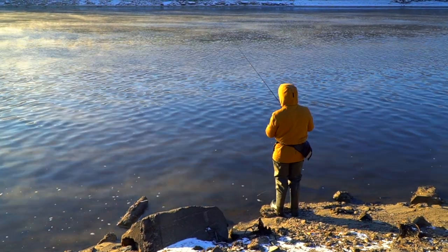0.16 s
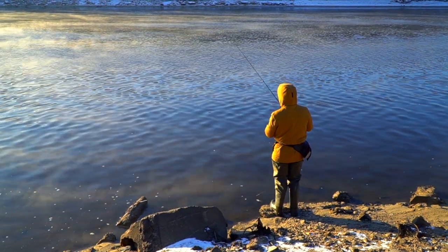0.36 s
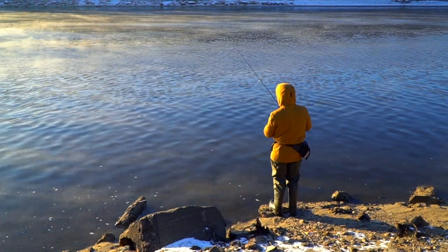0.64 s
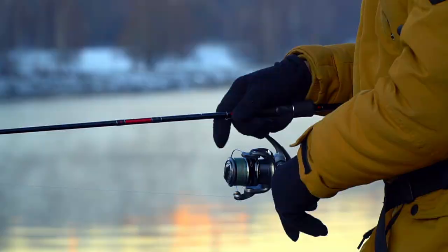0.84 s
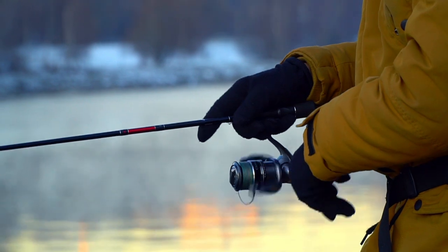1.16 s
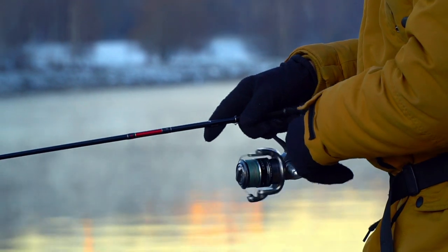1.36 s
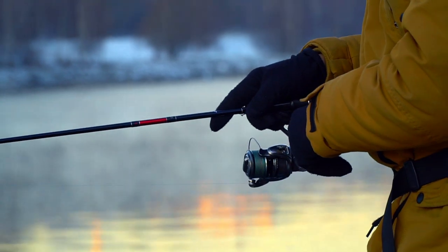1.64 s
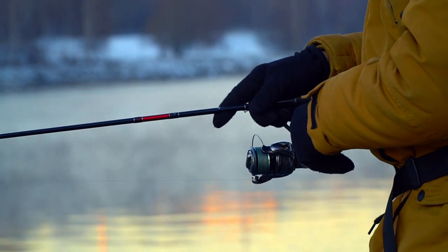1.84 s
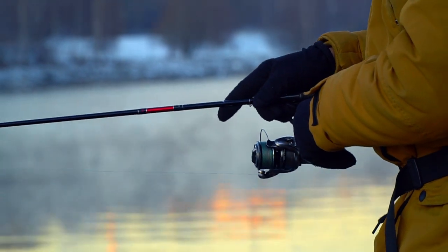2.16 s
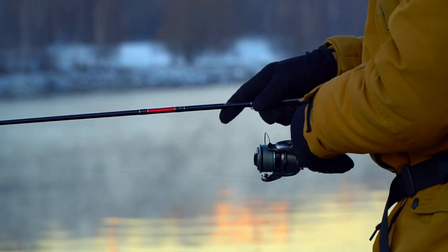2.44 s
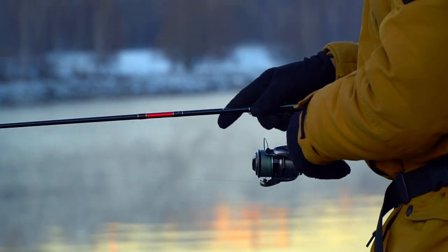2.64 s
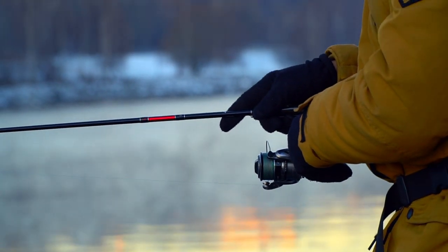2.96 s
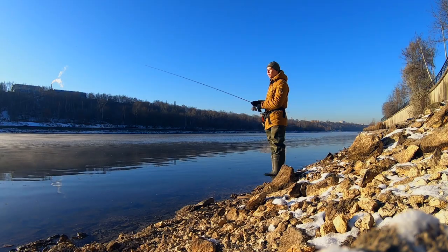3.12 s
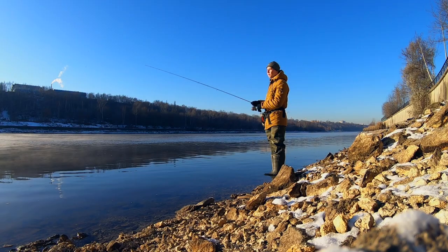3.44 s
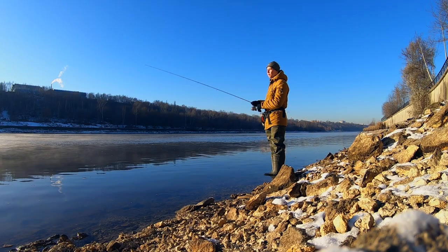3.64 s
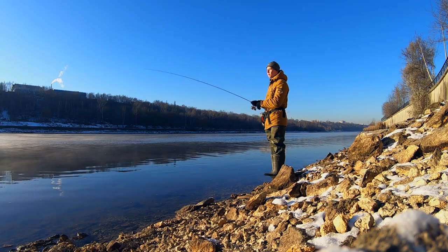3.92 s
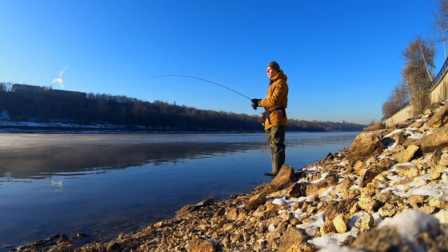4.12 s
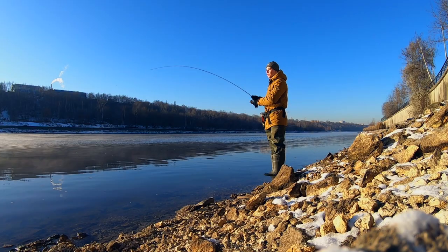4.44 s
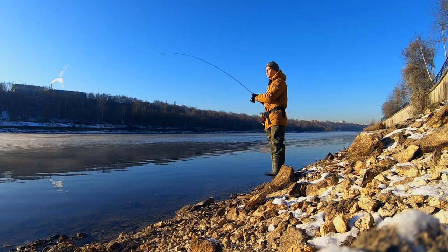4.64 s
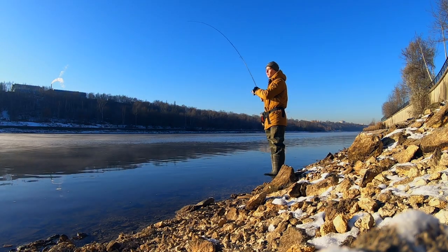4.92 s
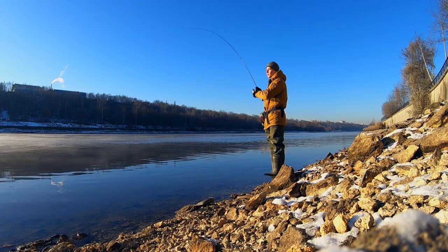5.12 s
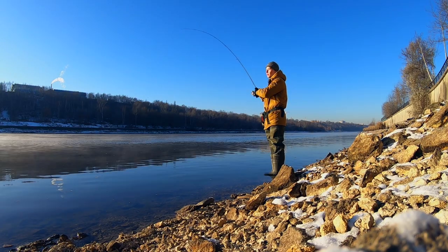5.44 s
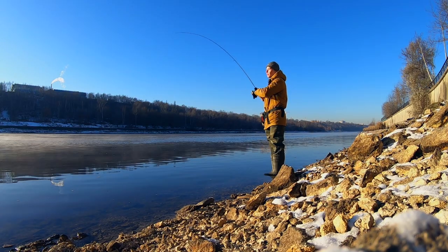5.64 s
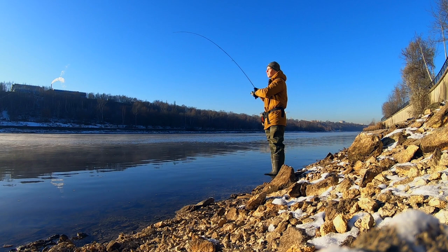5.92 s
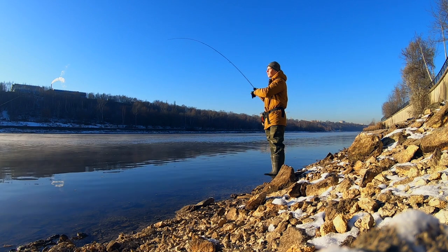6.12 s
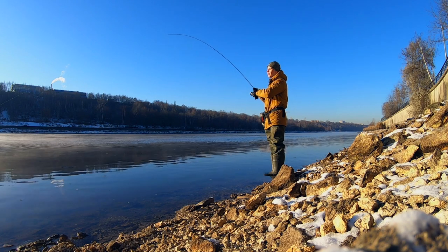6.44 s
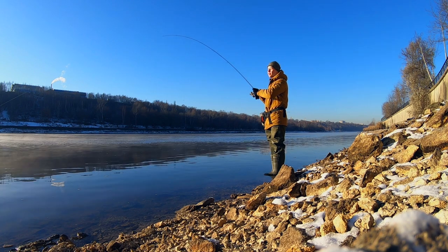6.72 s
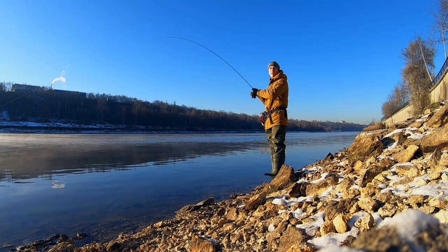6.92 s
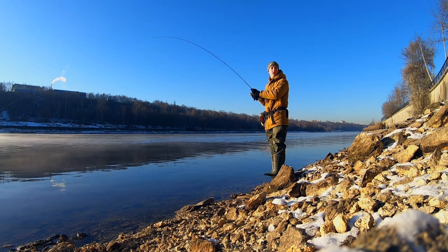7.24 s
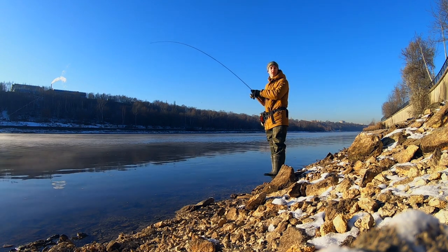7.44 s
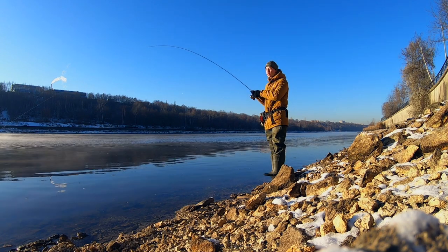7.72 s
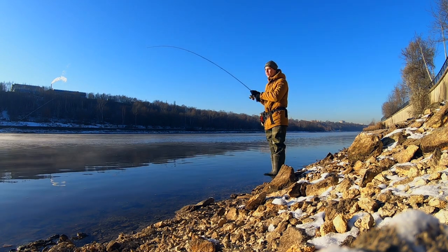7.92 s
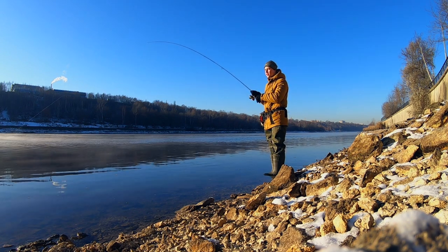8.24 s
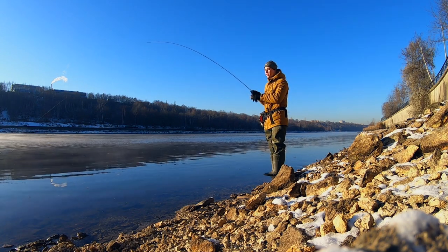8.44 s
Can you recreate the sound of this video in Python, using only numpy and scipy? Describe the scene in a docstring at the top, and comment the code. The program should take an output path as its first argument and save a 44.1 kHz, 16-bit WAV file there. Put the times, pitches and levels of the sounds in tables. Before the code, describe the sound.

Distant traffic rumbles continuously across an open riverbank for about eight and a half seconds, with no close sounds. The sound is mostly deep bass and muffled tyre drone, swelling only gently, with a softer wide roar and very faint hiss. From the start a low wavering hum around 320 Hz flutters and drops out, clearest until about 3.8 s, then mostly buried. Faint airy tyre whistling lies at the opening, and a tiny high squeak passes at 2.1 s. A heavy engine near 66 Hz beats slowly throughout, becoming strongest from roughly 3.8 to 5.8 s. Another low engine note climbs slightly, peaking about 6.5 s. At 6.7 s a faint mid-pitched tyre whistle appears and fades. Soft dull thuds follow near 7.4, 7.6, 7.9, 8.1 and 8.5 s. Stereo microphones are far away; the road's arrival is slightly left, with diffuse surroundings.

```python
"""A low traffic rumble with tyre roar and hiss, far off across a river bank, at two microphones.
Rumble and tyre drone are shaped noise arriving from the left as one front; roar and hiss are
independent noise at each microphone. A throbbing engine, a wavering hum, a whine and gliding
engine notes are wandering sines; far squeals mix narrow noise with a line; thuds are noise bursts."""
import sys
import numpy as np
from scipy import signal
from scipy.fft import rfft, irfft, next_fast_len
from scipy.io import wavfile
from scipy.ndimage import uniform_filter1d, map_coordinates

SR = 44100
rng = np.random.default_rng(int(sys.argv[2]) if len(sys.argv) > 2 else 0)


def digitize_waveform(pressure):
    """Quantize a signal to 16-bit integers and store it at the path in sys.argv[1].

    Rows of a 2-D input are taken as channels; values are limited to [-1, 1].
    """
    field = np.atleast_2d(pressure).T
    bounded = np.clip(field, -1, 1)
    quanta = np.round(bounded * 32767).astype(np.int16)
    wavfile.write(sys.argv[1], SR, quanta)


N = 378378
TIME_S = np.arange(N) / SR
LEFT_RIGHT = np.array([[1], [-1]])


def amp(level_db):
    """Gain of a level in dB."""
    return 10 ** (np.asarray(level_db) / 20)


def unit(x):
    """x at rms 1."""
    return x / np.sqrt(np.mean(x ** 2) + 1e-20)


def along(points, hz):
    """Interpolate (freq_hz, value) points on a log frequency axis."""
    point_hz, value = np.transpose(points)
    return np.interp(np.log(hz + 1), np.log(point_hz + 1), value)


def curves(rows):
    """One value per sample for each column after the time."""
    time_s, *columns = np.transpose(rows)
    return [np.interp(TIME_S, time_s, column) for column in columns]


def gate(rows, fade_s):
    """Linear fades centred on the first and last row times."""
    inside_s = np.minimum(TIME_S - rows[0][0], rows[-1][0] - TIME_S)
    return np.clip(inside_s / fade_s + .5, 0, 1)


def wobble(knots_per_s):
    """Smooth curve through random knots."""
    knots = rng.standard_normal(int(N * knots_per_s / SR) + 4)
    return map_coordinates(knots, [np.arange(N) * knots_per_s / SR])


def filtered(x, response):
    """x times a complex response of frequency."""
    size = next_fast_len(N + SR // 2)
    spectrum = rfft(x, size) * response(np.fft.rfftfreq(size, 1 / SR))
    return irfft(spectrum, size)[..., :N]


def noise(spectrum, patchy_db, channels):
    """Coloured noise of rms 1 with time-frequency patches of random gain, shared by the channels."""
    cells = signal.stft(rng.standard_normal((channels, N)), nperseg=2048)[2]
    patches = rng.standard_normal(cells.shape[1:])
    patches = uniform_filter1d(patches, size=8, axis=0)   # over frequency
    patches = uniform_filter1d(patches, size=10, axis=1)  # over time
    white = signal.istft(cells * amp(patchy_db * unit(patches)), nperseg=2048)[1][:, :N]
    return unit(filtered(white, lambda hz: amp(along(spectrum, hz))))


def tone(pitch_hz, waver_hz, knots_per_s):
    """A sine of rms 1 whose pitch wanders."""
    cycles = np.cumsum(pitch_hz + waver_hz * wobble(knots_per_s)) / SR
    return np.sqrt(2) * np.sin(2 * np.pi * (rng.random() + cycles))


# phase by which the left microphone leads: freq_hz, lead_rad
FRONT_LEAD = [(60, .02), (115, .03), (170, .1), (240, .18), (320, .33), (470, .78), (620, 1.6), (800, 2.8),
              (1300, 5)]


def front(x):
    """A sound from the left reaches the left microphone first: half the lead each way."""
    return filtered(x, lambda hz: np.exp(.5j * along(FRONT_LEAD, hz) * LEFT_RIGHT))


# slow swell of the road: time_s, deep_db, rumble_db, drone_db, roar_db, hiss_db
ROAD_LEVELS = [(0, -32, -31.5, -34.5, -43.5, -56), (.7, -29, -32.5, -34.5, -43.5, -55.5),
               (1.3, -27, -32.5, -35, -44, -57), (1.8, -29.5, -31, -34.5, -43, -57.5),
               (2.3, -31.5, -32.5, -33, -43.5, -58), (2.8, -29.5, -31.5, -33.5, -42.5, -56.5),
               (3.1, -28, -32, -33.5, -42.5, -56.5), (3.5, -30.5, -32.5, -31.5, -43, -57),
               (3.85, -31.5, -29, -31, -42.5, -57.5), (4.3, -31, -34, -34, -42.5, -57.5),
               (4.8, -29, -30.5, -33, -41.5, -57.5), (5.15, -28.5, -32.5, -33, -43, -57),
               (5.8, -28.5, -32.5, -34, -42.5, -57.5), (6.5, -26.5, -32.5, -36, -41.5, -58),
               (7, -28, -33.5, -36, -42, -59.5), (7.4, -29, -31.5, -33.5, -42.5, -60.5),
               (8, -28, -31.5, -35, -43, -59.5), (8.58, -31.5, -30.5, -33, -40.5, -58.5)]
# noise spectra: freq_hz, density_db (per Hz, relative)
DEEP_SPECTRUM = [(12, -29), (24, -12.5), (32, -11), (42, 0.5), (55, -0.5), (65, 2), (74, -1), (85, 3.5),
                 (100, -1.5), (115, -1), (150, -8.5), (200, -27.5), (400, -120)]
RUMBLE_SPECTRUM = [(40, -89), (80, -24), (120, -6.5), (165, 2.5), (230, -0.5), (280, -1), (330, -14),
                   (450, -44.5), (900, -120)]
DRONE_SPECTRUM = [(100, -100), (220, -31), (300, -5), (340, -1), (420, -8.5), (550, -12.5), (660, -16),
                  (800, -26), (1000, -36.5), (1400, -70.5), (2500, -120)]
ROAR_SPECTRUM = [(40, -38), (110, -10), (160, -9), (300, -4.5), (450, -11.5), (640, -0.5), (800, -0.5),
                 (1050, -3.5), (1700, -9.5), (2400, -17), (3500, -32), (6000, -62.5), (12000, -100)]
HISS_SPECTRUM = [(500, -58.5), (1500, -0.5), (3000, 1), (4500, -5), (7000, -12), (9500, -17), (12000, -24),
                 (14000, -32), (15300, -36)]
# short surges and dips of the front's layers: time_s, change_db
BASS_SURGES = [(3.82, 2), (4.36, 3), (7.04, 3), (7.96, 3), (8.1, -4), (8.28, 2.5)]
SURGE_HALF_S = 0.03  # centre to 1/e of the dB change
WANDER_DB, WANDER_KNOTS_PER_S = 0.31, 6  # small random level wander of each layer


def road():
    """Engines and tyre drone arrive as one front; roar and hiss differ between microphones."""
    deep_db, rumble_db, drone_db, roar_db, hiss_db = curves(ROAD_LEVELS)
    surges_db = sum(change_db * np.exp(-((TIME_S - time_s) / SURGE_HALF_S) ** 2)
                    for time_s, change_db in BASS_SURGES)

    def change_db():
        """Common surges plus a fresh random wander for each layer."""
        return surges_db + WANDER_DB * wobble(WANDER_KNOTS_PER_S)

    deep = amp(deep_db + change_db()) * noise(DEEP_SPECTRUM, patchy_db=0.23, channels=1)
    rumble = amp(rumble_db + change_db()) * noise(RUMBLE_SPECTRUM, patchy_db=1.0, channels=1)
    drone = amp(drone_db + change_db()) * noise(DRONE_SPECTRUM, patchy_db=0.36, channels=1)
    roar = amp(roar_db + 0.62 * wobble(3.09)) * noise(ROAR_SPECTRUM, patchy_db=1.1, channels=2)
    hiss = amp(hiss_db + .3 * wobble(6)) * noise(HISS_SPECTRUM, patchy_db=.3, channels=2)
    return front(deep + rumble + drone) + roar + hiss


# noise spectrum: freq_hz, density_db (per Hz, relative)
DIFFUSE_BASS_SPECTRUM = [(10, -42.5), (25, -9.5), (45, -9), (70, -4.5), (105, -1.5), (135, -7), (200, -12),
                         (400, -100)]


def diffuse_bass():
    """Diffuse deep rumble: noise independent at each microphone."""
    return amp(-40.5 + 1.1 * wobble(1.0)) * noise(DIFFUSE_BASS_SPECTRUM, patchy_db=2.5, channels=2)


# heavy engine: time_s, pitch_hz, level_db (before the nulls and wander; includes shallow dips)
ENGINE_THROB = [(0, 65.8, -28.5), (.7, 64.7, -33.5), (1.1, 64.94, -32), (1.7, 64.85, -35.5),
                (2.15, 64.6, -29), (2.6, 66.48, -39), (3.45, 63.1, -30.5), (3.7, 65.6, -29.5),
                (3.82, 68.3, -23.5), (4.19, 65.26, -21.5), (4.3, 65.7, -30), (4.38, 66.5, -18.5),
                (4.58, 68.1, -20.5), (4.78, 67, -24), (5.0, 65.55, -19.5), (5.13, 66.56, -32.5),
                (5.2, 68.2, -22.5), (5.39, 66.8, -20), (5.57, 69.03, -16.5), (5.66, 67.36, -25.5),
                (5.75, 65.5, -23.5), (6.1, 66.2, -42.5), (6.6, 63.3, -27), (7.3, 63.5, -29.5),
                (8.58, 64.7, -33.5)]
# moments when the beating note cancels: time_s
ENGINE_NULLS = [-.4, .13, .83, 1.57, 1.88, 2.55, 3.06, 3.66, 4.07, 4.46, 4.88, 5.45, 5.98, 6.33, 6.78, 7.65,
                8.05, 8.7]
THROB_SHAPE = 0.78  # exponent; below 1 the throbs are flat-topped


def heavy_engine():
    """A low note beats against itself: it cancels at each null and flips sign."""
    pitch_hz, level_db = curves(ENGINE_THROB)
    half_cycles = np.interp(TIME_S, ENGINE_NULLS, np.arange(len(ENGINE_NULLS)))
    beat = np.sin(np.pi * half_cycles)
    throb = np.sign(beat) * np.abs(beat) ** THROB_SHAPE
    return front(throb * amp(level_db + 1.8 * wobble(13)) * tone(pitch_hz, 0.69, 7))


# wavering hum: time_s, pitch_hz, level_db (line alone, before flutter)
HUM_LINE = [(0, 316, -35), (.3, 319, -32), (.62, 315, -31), (.83, 318, -42), (.95, 319, -35),
            (1.2, 318, -33), (1.46, 319, -30.5), (1.68, 320, -36), (1.81, 318, -55), (2.03, 321, -31),
            (2.18, 320, -41.5), (2.31, 315, -34), (2.5, 316, -51), (2.7, 317, -46), (2.79, 318, -25.5),
            (2.88, 320, -37.5), (3.0, 322, -34.5), (3.17, 322, -46), (3.28, 319, -30.5), (3.42, 317, -45),
            (3.6, 317, -39.5), (3.77, 322, -32.5), (3.95, 320, -48.5), (4.2, 320, -46), (4.38, 322, -39.5),
            (4.52, 320, -48), (4.72, 318, -35.5), (4.9, 318, -47.5), (5.7, 318, -54), (6.1, 318, -41),
            (7.3, 318, -49.5)]
# narrow noise around the hum: freq_hz, density_db (per Hz, relative)
HUM_FUZZ_SPECTRUM = [(240, -140), (290, -40), (306, -6), (320, 0), (338, -5), (365, -40), (430, -140)]
HUM_FUZZ_DB = -7  # relative to the line


def hum():
    """A wavering sine in narrow noise; moving air roughens its level."""
    pitch_hz, level_db = curves(HUM_LINE)
    flutter_db = 1.6 * wobble(20)
    line = tone(pitch_hz, 1.98, 20)
    fuzz = amp(HUM_FUZZ_DB) * noise(HUM_FUZZ_SPECTRUM, patchy_db=1.7, channels=1)[0]
    return front(gate(HUM_LINE, fade_s=0.077) * amp(level_db + flutter_db) * (line + fuzz))


# faint whine: pitch_hz, level_db (before wander)
WHINE_LINE = (2894, -78.5)


def whine():
    """A faint sine with small wanders of pitch and level."""
    pitch_hz, level_db = WHINE_LINE
    return front(amp(level_db + 3 * wobble(2.5)) * tone(pitch_hz, 1.2, 3))


# far squeals and whistling tyres: start_s, rise_s, hold_s, t60_s (noise), pitch_hz, width_hz,
# level_db (before flicker), left_over_right_db, line_share (of power, 0-1)
FAR_SQUEALS = [(0, 0.0088, 0.8, 5, 1720, 270, -56, 4, 0.1),
               (-.1, 0.1, 2.0, 5, 2180, 400, -66.5, -2.5, 0.01),
               (2.118, 0.052, 0.059, 1.3, 8730, 330, -64, 2, 0.5),
               (3.489, .03, .04, .7, 8520, 260, -73.5, 0, .3),
               (5.12, .1, .15, 0.79, 10680, 901, -79, -3, 0),
               (6.72, 0.04, 0.6, 1.8, 1208, 110, -47.5, -1, .5),
               (7.2, 0.25, 0.65, 3.2, 10450, 950, -76.5, 2, 0.02)]
LINE_WAVER = .18  # pitch wander scale, share of width_hz
LINE_FALL_RATIO = 1.5  # dB fall rate of the line over that of the noise


def squeals():
    """Narrow noise around a wavering line flickers, rises, holds and dies away."""
    total = np.zeros((2, N))
    for start_s, rise_s, hold_s, t60_s, pitch_hz, width_hz, level_db, pan_db, line_share in FAR_SQUEALS:
        band = unit(filtered(rng.standard_normal((2, N)),
                             lambda hz: np.exp(-2 * ((hz - pitch_hz) / width_hz) ** 2)))
        line = np.array([tone(pitch_hz, LINE_WAVER * width_hz, 18) for _ in range(2)])
        share = np.clip(line_share, 0, 1)
        fall_db = -60 * np.clip(TIME_S - start_s - rise_s - hold_s, 0, None) / t60_s
        shape = np.clip((TIME_S - start_s) / rise_s, 0, 1) * amp(fall_db)
        line_fall = amp((LINE_FALL_RATIO - 1) * fall_db)  # on top of shape
        mix = np.sqrt(1 - share) * band + np.sqrt(share) * line_fall * line
        total += amp(level_db + 1.8 * wobble(25) + pan_db * .5 * LEFT_RIGHT) * shape * mix
    return total


# faint gliding notes: start_s, end_s, first_hz, last_hz, level_db (top of swell, before wander)
GLIDES = [(-.4, 1.12, 58, 50.5, -42.5), (-.4, 2.3, 77.3, 79.2, -47), (2.2, 4.9, 86, 96.4, -54),
          (2.801, 3.9, 39, 43.8, -44), (5.6, 7.1, 48.5, 55.4, -48), (6.1, 7.1, 50.5, 67, -41)]


def faint_notes():
    """Gliding engine notes, opposite in phase left to right; each swells and fades once."""
    total = np.zeros(N)
    for start_s, end_s, first_hz, last_hz, level_db in GLIDES:
        done = np.clip((TIME_S - start_s) / (end_s - start_s), 0, 1)
        swell = np.abs(np.sin(np.pi * done)) ** .7
        pitch_hz = first_hz + (last_hz - first_hz) * done
        total += swell * amp(level_db + 2.5 * wobble(3)) * tone(pitch_hz, 0.8, 4)
    return total * LEFT_RIGHT


# accelerating engine: time_s, pitch_hz, level_db (before wander)
ENGINE_CLIMB = [(1, 63.2, -48), (2.38, 65.9, -45), (3.1, 65.3, -48), (4.2, 68.5, -50), (4.79, 70.2, -39),
                (5.48, 72.3, -35.5), (6.5, 74.53, -26.5), (6.9, 73.7, -31), (7.2, 74.2, -38),
                (8.58, 73.5, -47)]


def accelerating_engine():
    """A climbing engine note, opposite in phase left to right."""
    pitch_hz, level_db = curves(ENGINE_CLIMB)
    note = gate(ENGINE_CLIMB, fade_s=.2) * amp(level_db + 1.5 * wobble(5)) * tone(pitch_hz, 0.42, 6)
    return note * LEFT_RIGHT


# soft far thuds, as of wheels over road joints: start_s, level_db (before rise and decay)
ROAD_THUDS = [(7.392, -32), (7.598, -29.5), (7.908, -28.5), (8.118, -30), (8.52, -30)]
# noise spectrum: freq_hz, density_db (per Hz, relative)
THUD_SPECTRUM = [(60, -60), (150, -14), (300, 0), (500, -2), (800, -5), (1200, -25), (2500, -100)]
THUD_RISE_S, THUD_T60_S = .004, .32  # rise is a time constant


def thuds():
    """Dull noise bursts with a quick exponential rise and a short decay."""
    shape = np.zeros(N)
    for start_s, level_db in ROAD_THUDS:
        after_s = np.clip(TIME_S - start_s, 0, None)
        rise = 1 - np.exp(-after_s / THUD_RISE_S)
        shape += rise * amp(level_db - 60 * after_s / THUD_T60_S)
    return front(shape * noise(THUD_SPECTRUM, patchy_db=0, channels=1))


def scene():
    """Everything at the two microphones."""
    traffic = road() + diffuse_bass()
    front_tones = heavy_engine() + hum() + whine()
    return traffic + front_tones + squeals() + faint_notes() + accelerating_engine() + thuds()


# left over right microphone: freq_hz, difference_db
MIC_MISMATCH = [(300, 0.27), (450, 0), (560, 0), (680, 4.5), (850, 1), (1200, 0.5), (1800, 2.5),
                (2700, 1.5), (10000, 0.5)]
# constant converter offset, one row per channel: offset (full scale = 1)
CONVERTER_OFFSET = [
    [-.0037],
    [-.0045],
]
TOP_HZ = 15400  # band limit


def record(dry):
    """Microphone mismatch split between channels, a sharp band limit, then a constant offset."""
    def response(hz):
        mismatch = amp(along(MIC_MISMATCH, hz) * .5 * LEFT_RIGHT)
        return mismatch * (hz < TOP_HZ)

    return filtered(dry, response) + np.array(CONVERTER_OFFSET)


dry = scene()
out = record(dry)
digitize_waveform(out)
```